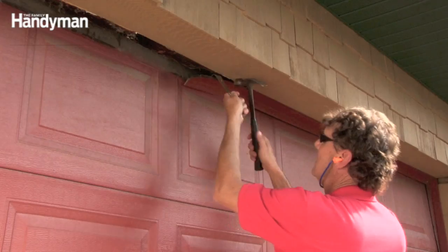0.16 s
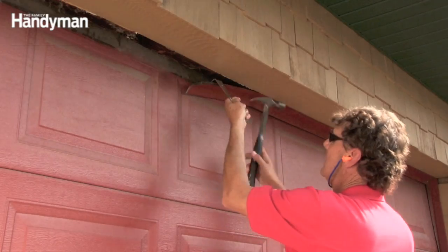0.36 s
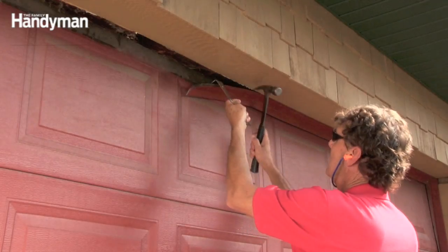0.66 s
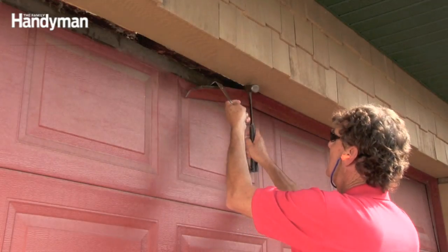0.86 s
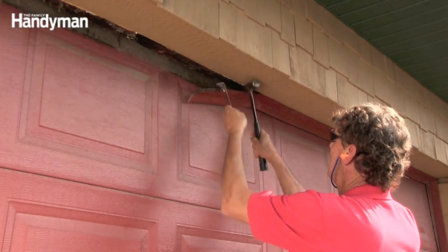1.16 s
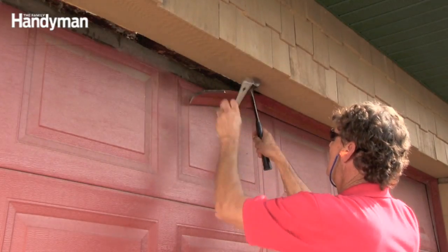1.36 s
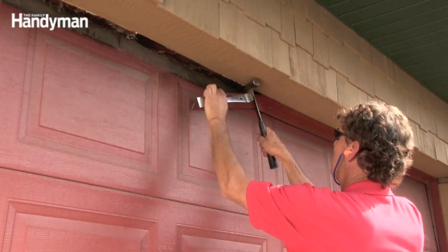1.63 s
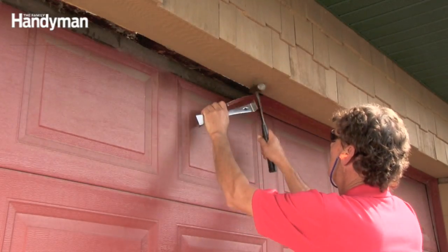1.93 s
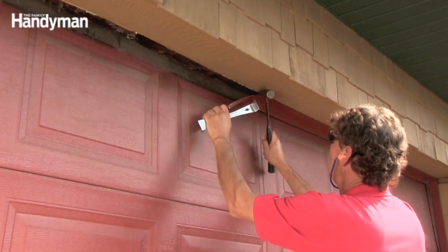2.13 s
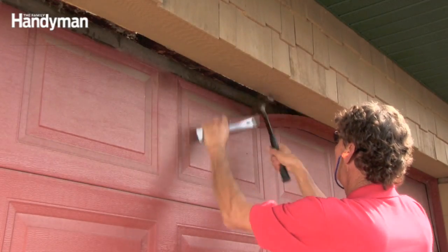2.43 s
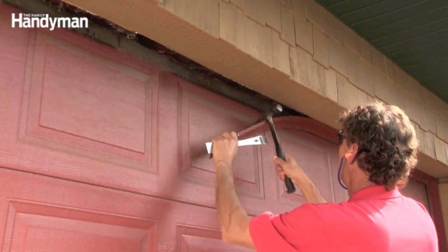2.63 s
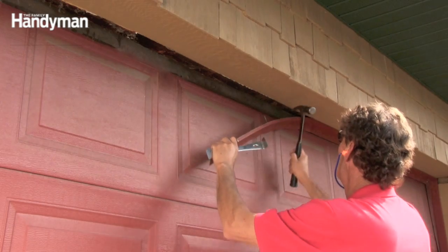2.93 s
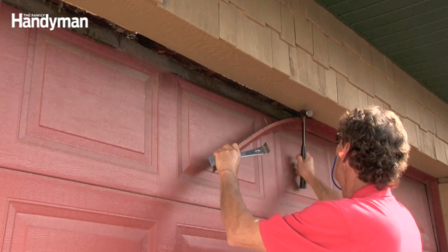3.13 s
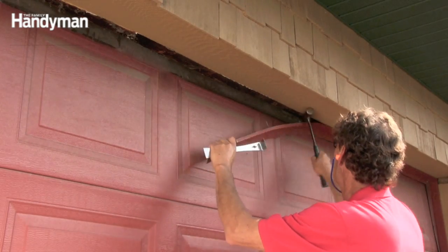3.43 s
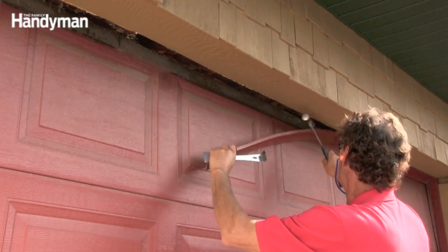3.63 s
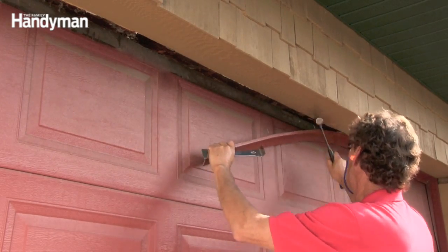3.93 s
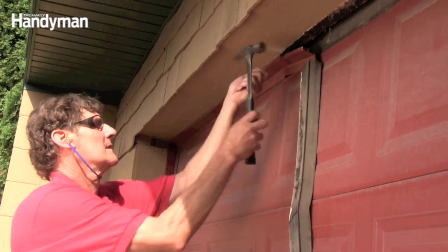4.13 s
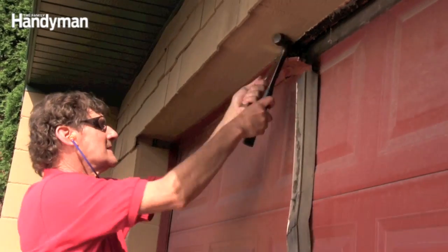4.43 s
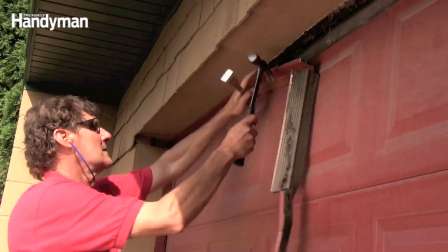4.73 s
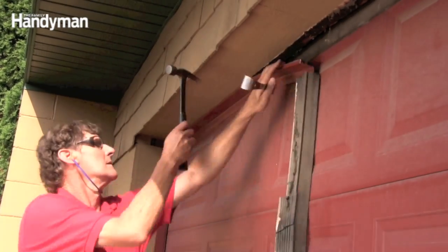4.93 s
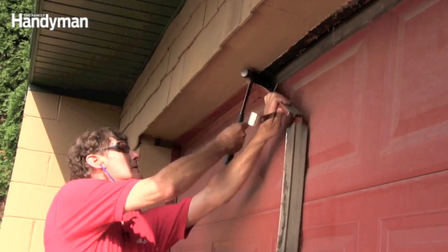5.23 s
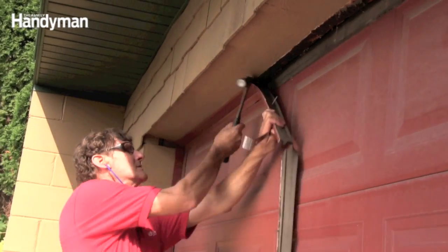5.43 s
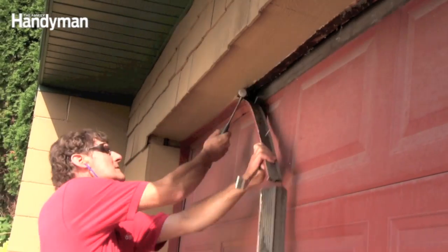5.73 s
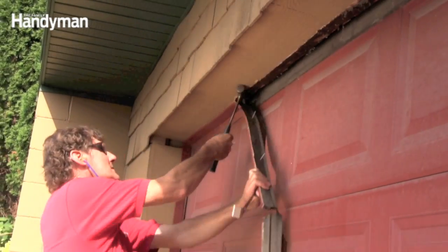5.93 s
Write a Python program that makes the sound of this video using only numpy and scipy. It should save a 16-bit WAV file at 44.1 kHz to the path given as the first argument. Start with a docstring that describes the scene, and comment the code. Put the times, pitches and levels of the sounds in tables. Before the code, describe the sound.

Close outdoor work on a wooden garage door frame, over a soft low rumble. From 0 to 0.3 s a faint steel ring and light taps; at 0.8-0.95 dull knocks and short rubbing scrapes. Around 1.25 a tiny metallic squeak and thin high ping, then very faint ticks to 1.8. At 2.1-2.3 firmer knocks boom in the door; at 2.4-2.56 a nail jerks loose in a quick stutter with strong knocks. A faint ping at 2.75, knocks at 3.1-3.3, then a slower ratcheting pull at 3.45-3.55 with gritty scraping. Ticks lead to bright wood cracks at 3.84 and 3.96. The air becomes a boxy sheltered hush. Clicks at 4.3, then a big splintering snap at 4.55-4.62. Scattered taps and scrapes follow from 4.84, a harsh nail screech lasting a few hundredths at 5.6, and small dry ticks until 6.0.

```python
"""Prying trim off a garage door frame

A claw hammer and a steel pry bar lever an old wooden stop loose: knocks, taps, splits and scrapes.
Blows are shaped fracture noise plus damped wood modes; the bar and grazed nails ring as decaying sines.
Nails let go in stick-slip jerks and one screech made of slip pulses driving nail modes.
The door panel booms behind the heavy knocks, the eave answers, and filtered noise is the outdoor air."""
import sys
import numpy as np
from scipy import signal
from scipy.fft import rfft, irfft, next_fast_len
from scipy.io import wavfile
from scipy.ndimage import map_coordinates

SR = 44100
rng = np.random.default_rng(int(sys.argv[2]) if len(sys.argv) > 2 else 0)


def inscribe(sig):
    """Save sig as 16-bit PCM at rate SR to the path in sys.argv[1].

    A 1-D sig is mono; a 2-D sig holds one channel per row.
    Samples are clipped to [-1, 1] before scaling.
    """
    pcm = np.round(np.clip(np.atleast_2d(sig).T, -1, 1) * 32767)
    wavfile.write(sys.argv[1], SR, pcm.astype(np.int16))


N = 267466
CLOCK_S = np.arange(N) / SR
T = np.arange(SR * 3 // 5) / SR  # time within one event, s


def amp(db):
    """Decibels to gain."""
    return 10 ** (np.asarray(db) / 20)


def unit(x):
    """Scale to rms 1."""
    return x / np.sqrt(np.mean(x ** 2) + 1e-20)


def punch(x):
    """Scale a blow so that its first 10 ms have rms 1."""
    return x / np.sqrt(np.mean(x[:SR // 100] ** 2) + 1e-20)


def along(points, hz):
    """Read (Hz, value) points on a log-frequency axis."""
    point_hz, value = np.transpose(points)
    return np.interp(np.log(hz + 1), np.log(point_hz), value)


def near(hz, centre_hz, octaves):
    """Bell of height 1 on the log-frequency axis."""
    return np.exp(-.5 * (np.log2((hz + 1) / centre_hz) / octaves) ** 2)


def fade(t60_s):
    """Exponential decay, 60 dB in t60_s."""
    return np.exp(-np.log(1000) * T / max(t60_s, 1e-3))


def add(track, start_s, x):
    """Mix x into the track at start_s."""
    part = track[max(round(start_s * SR), 0):][:len(x)]
    part += x[:len(part)]


def colour(x, points, peak_hz=1000, peak_db=0):
    """Minimum-phase filter with the given spectrum and an optional resonance."""
    m = 2 * next_fast_len(len(x) // 2 + 2048)
    hz = np.fft.rfftfreq(m, 1 / SR)
    gain_db = along(points, hz) + peak_db * near(hz, peak_hz, octaves=0.32)
    cepstrum = irfft(np.log(amp(gain_db)), m)
    # fold onto positive time: causal response
    cepstrum[1:m // 2] *= 2
    cepstrum[m // 2 + 1:] = 0
    return irfft(rfft(x, m) * np.exp(rfft(cepstrum)), m)[:len(x)]


def wobble(rate_hz, size):
    """Smooth random curve, rate_hz knots a second."""
    knots = rng.standard_normal(size // 8)
    return map_coordinates(knots, [np.arange(size) * rate_hz / SR], mode="mirror")


def ring(modes, scatter_db, detune):
    """Damped modes; each contact point draws new strengths, signs and slightly new pitches."""
    out = np.zeros(len(T))
    for hz, db, t60_s in modes:
        strength, pitch, sign = rng.standard_normal(3)
        tone = np.sin(2 * np.pi * hz * (1 + detune * pitch) * T)
        out += np.sign(sign) * amp(db + scatter_db * strength) * fade(t60_s) * tone
    return out


def fibres(size, clump_db):
    """Dense, clumped micro-fractures: noise with a random gain."""
    return unit(rng.standard_normal(size) * amp(clump_db * wobble(1532, size)))


# open-air rumble: (frequency [Hz], relative density [dB])
OPEN_SPECTRUM = [(15, -44), (25, -57), (55, -4), (80, -7), (130, -6), (195, -24.5), (416, -24.5),
                 (503, -21), (659, -27), (1020, -29), (1940, -39.5), (2350, -43), (4610, -53.5),
                 (7510, -49.5), (16000, -63)]
# sheltered corner: (frequency [Hz], relative density [dB])
CORNER_SPECTRUM = [(24, -83.5), (40, -63), (133, -10), (194, -5.5), (237, 1), (491, -12.5), (751, -18),
                   (896, -18.5), (990, -17), (1760, -21), (2050, -22), (5440, -32.5), (16000, -48)]
# thin high tones outdoors: (frequency [Hz], relative density [dB])
SIZZLE_SPECTRUM = [(5500, -14.5), (6150, 1), (6500, -11), (7250, -11.5), (7420, -5), (7580, -8), (7740, 11),
                   (8020, -25), (8400, 4), (8750, -10), (9400, -5), (11000, -14)]
# outdoor beds: (time [s], open rumble level [dB], corner level [dB], sizzle level [dB])
AIR_LEVELS = [(0, -44.5, -58, -92.5), (.5, -49, -64, -104), (2, -47, -64.5, -74.5), (3, -48.5, -60, -71.5),
              (4.1, -48, -48.5, -71), (4.5, -53.5, -49, -67), (4.75, -82, -46.5, -91),
              (5.4, -85, -47.5, -87), (6.06, -105, -52.5, -71)]


def air():
    """Low outdoor rumble gives way to the boxier hush of the corner under the eave."""
    times_s, *levels_db = np.transpose(AIR_LEVELS)
    out = np.zeros(N)
    for spectrum, db in zip((OPEN_SPECTRUM, CORNER_SPECTRUM, SIZZLE_SPECTRUM), levels_db):
        bed = unit(colour(rng.standard_normal(N), spectrum))
        out += bed * amp(np.interp(CLOCK_S, times_s, db) + 0.37 * wobble(20.0, N))
    return out


def splinters(rate_hz):
    """Single fibres parting at random moments, a few of them loud."""
    chance, size = rng.random(len(T)), rng.standard_normal(len(T))
    return unit(size * (chance < rate_hz / SR))


# door frame modes: (frequency [Hz], relative level [dB], t60 [s])
FRAME_MODES = [(229, 8, 0.17), (265.8, 4, 0.54), (288, -15, 0.53), (356.3, 13.5, 0.11), (402, 0.5, 0.29),
               (457, -8, 0.23), (497, 17, 0.08), (617, 13.5, 0.12), (600, -24.5, 0.067), (726, -31.5, 0.17)]
# loose trim modes: (frequency [Hz], relative level [dB], t60 [s])
TRIM_MODES = [(745, 9, 0.028), (868.5, 10.5, 0.05), (940, 3.5, 0.093), (967, -19, 0.017),
              (1184, -1.5, 0.14), (1305, -3.5, 0.054), (1420, 7, .026), (1496, -4, 0.039),
              (1530, 11.5, 0.014), (1670, 12.5, 0.013), (1910, -3, .03), (2064, -4.5, .07)]
# rubbing wood: (frequency [Hz], relative density [dB])
RUB_SPECTRUM = [(40, -81), (150, -33.5), (350, 10.5), (700, 6.5), (1300, 8.5), (1700, 2.5), (2300, 0),
                (4000, -11.5), (9000, -81)]
# scrape grit: (frequency [Hz], relative density [dB])
GRIT_SPECTRUM = [(1200, -43), (2500, 4), (5500, 10.5), (7500, 2), (12000, -2), (16000, -5)]
# trim and tools dragging: (start [s], length [s], level [dB], grit re body [dB])
SCRAPES = [(0, 0.037, -60.5, -2), (0.826, 0.081, -44.5, -22), (0.918, 0.03, -43.5, -6.5),
           (2.215, 0.1, -47, -12), (2.464, 0.036, -41, 2), (3.49, 0.1, -42, 9.5), (3.554, 0.2, -48, -6.5),
           (4.604, 0.094, -32, -30), (5.028, 0.12, -36.5, -15.5), (5.105, 0.072, -46, -14.5)]


def scrapes():
    """Each stroke swells quickly and runs out; its grains sound in the wood."""
    out = np.zeros(N)
    for start_s, length_s, db, grit_db in SCRAPES:
        stroke = np.abs(np.sin(np.pi * np.clip(T / length_s, 0, 1) ** 0.43))
        grains = fibres(len(T), clump_db=-1.0) + 0.49 * splinters(rate_hz=240)
        modes = ring(list(FRAME_MODES) + list(TRIM_MODES), scatter_db=-5.0, detune=.005)
        wood = signal.fftconvolve(grains, modes * fade(.15))[:len(T)]
        body = unit(unit(colour(grains, RUB_SPECTRUM)) + 0.35 * unit(wood))
        grit = amp(grit_db) * unit(colour(grains, GRIT_SPECTRUM))
        add(out, start_s, amp(db) * stroke * (body + grit))
    return out


# free pry bar modes: (frequency [Hz], relative level [dB], t60 [s])
STEEL_MODES = [(2600, 12, 0.15), (3800, 11, 0.2), (5000, 2, 0.32), (13400, -22, 0.22)]
# pry bar squeaking under load: (frequency [Hz], relative density [dB])
SQUEAK_SPECTRUM = [(400, -16), (900, 8), (1230, 9), (1700, 3), (2200, -11), (3000, -19), (3500, -6),
                   (3950, -14), (4600, -3), (5600, -21), (11300, -22), (12200, -21), (13200, -21)]
# pry bar skidding over a nail head: (start [s], length [s], level [dB])
SKIDS = [(1.236, 0.036, -46), (1.276, 0.016, -46.5)]


def steel():
    """The free bar rings thinly; the skidding bar stutters and squeaks."""
    out = np.zeros(N)
    add(out, 0, amp(-59) * punch(ring(STEEL_MODES, scatter_db=1, detune=.002)))
    for start_s, length_s, db in SKIDS:
        stutter = amp(3 * wobble(226, len(T))) * (T < length_s)
        squeak = unit(colour(rng.standard_normal(len(T)) * stutter, SQUEAK_SPECTRUM))
        add(out, start_s, amp(db) * np.sqrt(length_s / T[-1]) * squeak)
    return out


# wood pitches and door boom strength, set around each group of blows:
# (time [s], frame pitch [Hz], trim pitch [Hz], coupling to the door [dB])
RESPONSES = [(0.05, 231, 1470, 4), (0.9, 209, 1026, 0), (2.27, 225, 870, 1), (2.41, 510, 1220, -7),
             (2.46, 500, 1170, 6), (2.56, 360, 776, 0), (3.14, 403, 1440, -4.5), (3.85, 370, 1440, 11.5),
             (3.971, 327, 1340, -22), (4.551, 300, 1460, -64), (5.4, 255, 1400, -50)]


def response(time_s):
    """Frame pitch, trim pitch and door coupling interpolated at time_s."""
    times_s, *columns = np.transpose(RESPONSES)
    return [np.interp(time_s, times_s, column) for column in columns]


def favour(modes, centre_hz):
    """The point of contact favours the modes around one pitch."""
    return [(hz, db + 11 * near(hz, centre_hz, octaves=0.22), t60_s) for hz, db, t60_s in modes]


# crack body: (frequency [Hz], relative density [dB])
CRACK_SPECTRUM = [(900, -26.5), (1700, 2.5), (2300, 4), (3200, 1.5), (4500, 0), (6100, -2), (7500, -11.5),
                  (11000, -31)]
# bright edge of a crack: (frequency [Hz], relative density [dB])
EDGE_SPECTRUM = [(4000, -46.5), (6500, -2.5), (8000, 5.5), (10500, 7), (13000, 5.5), (16000, -5.5)]
# crowded wall modes: (frequency [Hz], relative density [dB])
THUD_SPECTRUM = [(50, -63.5), (130, -7.5), (230, 2.5), (500, -0.5), (750, -5.5), (1100, -13.5), (3000, -46)]


def contact(crack_db, edge_db, trim_db, frame_db, t60_s, trim_hz, crack_hz, frame_hz, rise_s, clump_db, snap):
    """A burst of fracture noise, the clack of the trim and the duller knock of the frame."""
    # the first fibre gives with a snap, the rest follow
    envelope = (fade(t60_s) + snap * fade(0.003)) * (1 - np.exp(-T / rise_s))
    burst = fibres(len(T), clump_db) * envelope
    crack = punch(colour(burst, CRACK_SPECTRUM, crack_hz, peak_db=6.5))
    edge = punch(colour(burst, EDGE_SPECTRUM, crack_hz, peak_db=14.0))
    # extra fades: the pressing tool damps the modes
    strip = ring(favour(TRIM_MODES, trim_hz), scatter_db=4.5, detune=0.009) * fade(.12)
    rub = colour(burst, RUB_SPECTRUM, trim_hz, peak_db=9.5)
    clack = punch(punch(strip) + punch(rub))
    wall = colour(rng.standard_normal(len(T)) * fade(0.14), THUD_SPECTRUM, frame_hz, peak_db=5)
    frame = ring(favour(FRAME_MODES, frame_hz), scatter_db=0.5, detune=0.005) * fade(0.45)
    knock = (punch(frame) + punch(wall)) * (1 - np.exp(-T / 0.00056))
    knock = knock / np.std(knock[:SR // 40])
    return amp(crack_db) * crack + amp(edge_db) * edge + amp(trim_db) * clack + amp(frame_db) * knock


# centres of (crack, edge, trim, frame) and the pivot of the hardness tilt
LAYER_HZ, PIVOT_HZ = (3200, 9000, 1200, 350), 1800


def strike(level_db, time_s, hardness_db_oct, mix_db, t60_s, crack_hz, rise_s, clump_db, snap):
    """One contact: hardness favours the high layers, the time sets the pitch of the wood."""
    frame_hz, trim_hz, _ = response(time_s)
    tilt_db = hardness_db_oct * np.log2(np.array(LAYER_HZ) / PIVOT_HZ)
    layers_db = level_db + np.array(mix_db) + tilt_db
    return contact(*layers_db, t60_s, trim_hz, crack_hz, frame_hz, rise_s, clump_db, snap)


# door panel modes: (frequency [Hz], relative level [dB], t60 [s])
DOOR_MODES = [(80, -8, 0.2), (92.75, -0.5, 0.36), (108, -6, 0.26), (138.4, -13, 0.31), (163.4, -1.5, 0.11),
              (222, 0.5, 0.14)]


def boom():
    """The wide door panel, pushed at its edge, takes a moment to swing up."""
    detune = 1 + 0.012 * rng.standard_normal()
    panel = np.zeros(len(T))
    for hz, db, t60_s in DOOR_MODES:
        phase_rad = rng.normal(0, 0.73)
        panel += amp(db) * fade(t60_s) * np.sin(2 * np.pi * hz * detune * T + phase_rad)
    panel = panel * (1 - np.exp(-T / 0.009))
    return panel / np.max(np.abs(panel))


def shake(time_s, db):
    """The door booms as far as the blow reaches it."""
    return amp(db + response(time_s)[2]) * boom()


# tool set against the trim, or trim slapping back:
# (time [s], level before mix [dB], hardness [dB/octave], door push re level, before coupling [dB])
KNOCKS = [(0.0414, -43.5, 0, 10.5), (0.2254, -39.5, 3.2, -5.5), (0.83, -36.5, 2.3, 19.5),
          (0.9372, -41.5, -1.5, 14), (2.128, -31.5, 1.2, 11), (2.2693, -32.5, 0.3, 2),
          (2.4528, -23, 0.5, 2.5), (2.4621, -23, 0.5, -23), (2.5099, -34.5, 2, 11), (2.563, -36.5, -1, -4),
          (3.1371, -32, 0.6, 12.5), (3.2468, -32, 4.8, 1.5), (3.3038, -36.5, -1.1, 15)]
KNOCK_MIX_DB = (-9.5, -24.5, 1, 1)  # crack, edge, trim, frame


def knocks():
    """Dull, heavy contacts that shake the door."""
    out = np.zeros(N)
    for time_s, db, hardness, push_db in KNOCKS:
        blow = strike(db, time_s, hardness, KNOCK_MIX_DB, t60_s=0.019, crack_hz=2800,
                      rise_s=0.00053, clump_db=11.5, snap=0.6)
        add(out, time_s, blow + shake(time_s, db + push_db))
    return out


# fibres and paint flakes ticking while a tool shifts:
# (start [s], length [s], mean level before mix [dB], hardness [dB/octave])
STRAINS = [(0.298, 0.055, -76, 9), (1.624, 0.12, -83, 15.5), (2.8, 0.022, -56, 2.5),
           (4.374, 0.078, -56, 3.5), (5.362, .11, -56.5, 3.5)]
STRAIN_SCATTER_DB = 3


def strained(count):
    """Faint ticks, one at random in each of count equal parts of a spell of strain."""
    out = []
    for start_s, length_s, mean_db, hardness in STRAINS:
        for k in range(count):
            time_s = start_s + length_s * (k + rng.random()) / count
            db = mean_db + STRAIN_SCATTER_DB * rng.standard_normal()
            out.append((time_s, db, hardness, .014, 2700))
    return out


# light tool taps: (time [s], level before mix [dB], hardness [dB/octave], crack t60 [s], crack pitch [Hz])
TICKS = [(0.1402, -49, 2, 0.019, 6600), (1.0782, -55, -5.5, 0.028, 2850), (1.2426, -60.5, -8, 0.015, 4640),
         (1.5487, -50.5, -1, 0.023, 2220), (1.6942, -55.5, -1.5, .014, 2340),
         (1.7983, -55, -5, 0.022, 4740), (2.798, -48, 7, 0.013, 2710), (3.4246, -50.5, 3, 0.018, 3400),
         (3.6037, -39.5, 3, .011, 5100), (3.704, -39, 0, 0.042, 2950), (3.7368, -35.5, 4, 0.0088, 3960),
         (4.3028, -41, -0.5, 0.0032, 2230), (4.341, -34.5, 0, 0.041, 2220),
         (4.844, -35.5, -1.3, 0.017, 4280), (5.1508, -46, -1.5, .03, 2620),
         (5.1932, -51, -2.5, 0.019, 2600), (5.254, -37.5, -1.5, 0.007, 2560),
         (5.4844, -40.5, 0.5, 0.016, 2500), (5.527, -34.5, -1.5, 0.021, 2800),
         (5.6313, -32, 0, 0.013, 6400), (5.8353, -38, 3, 0.018, 2400), (5.9185, -43.5, 7, 0.0057, 7440),
         (6.0001, -45, 1, .026, 2800)]
TICK_MIX_DB = (-0.5, -13, 1, -2.5)  # crack, edge, trim, frame


def ticks():
    """Light contacts leave the door still."""
    out = np.zeros(N)
    for time_s, db, hardness, t60_s, crack_hz in list(TICKS) + strained(count=4):
        tap = strike(db, time_s, hardness, TICK_MIX_DB, t60_s, crack_hz,
                     rise_s=0.0013, clump_db=8.5, snap=1.9)
        add(out, time_s, tap)
    return out


# grazed nails: (time [s], peak level [dB], pitch [Hz], t60 [s])
PINGS = [(1.273, -56, 12260, 0.13), (2.745, -60.5, 5955, 0.38)]


def pings():
    """Each grazed nail swells into one thin tone; a long ring builds slowly."""
    out = np.zeros(N)
    for time_s, db, hz, t60_s in PINGS:
        tone = fade(t60_s) * (1 - fade(.4 * t60_s)) * np.sin(2 * np.pi * hz * T)
        add(out, time_s, amp(db) * tone / np.max(np.abs(tone)))
    return out


# nail leaving the frame in jerks: (start [s], length [s], gap [s], first level before mix [dB],
# loss a jerk [dB], door push re level, before coupling [dB], crack pitch [Hz])
NAIL_PULLS = [(2.3976, .058, .0117, -22.5, 0.2, -11, 3980), (3.4498, .099, .0165, -21.5, 1, -3.5, 4980)]
JERK_MIX_DB = (-3, -12, 1.5, -1.5)  # crack, edge, trim, frame
FIRST_STICK_GAPS = .19  # extra hold of the first jerk
FIRST_DULL_DB_OCT, SHARPEN_DB_OCT = -1.5, 0.72  # hardness of the first jerk; gain per later jerk


def pulls():
    """A nail breaks loose with a dull jerk, then sticks and slips evenly, weaker and harder each time."""
    out = np.zeros(N)
    for start_s, length_s, gap_s, first_db, loss_db, push_db, crack_hz in NAIL_PULLS:
        for k in range(round(length_s / gap_s)):
            time_s = start_s + gap_s * (k + FIRST_STICK_GAPS * (k > 0))
            db = first_db - loss_db * k
            hardness = SHARPEN_DB_OCT * k + FIRST_DULL_DB_OCT * (k == 0)
            jerk = strike(db, time_s, hardness, JERK_MIX_DB, t60_s=0.014, crack_hz=crack_hz,
                          rise_s=0.0011, clump_db=2.0, snap=1.6)
            add(out, time_s, jerk + shake(time_s, db + push_db))
    return out


# wood snapping free: (time [s], level before mix [dB], hardness [dB/octave], crack t60 [s], crack pitch [Hz])
SPLITS = [(3.8402, -30, 7, 0.019, 10400), (3.8437, -24, -4.5, 0.033, 5000), (3.9547, -28, -2, 0.012, 4400),
          (3.9624, -22, 2.5, 0.025, 3800), (4.5469, -16.5, 0.5, 0.037, 2210),
          (4.558, -22, -3.5, 0.067, 2560), (4.5888, -27.5, 3, 0.028, 5370),
          (4.609, -31.5, -1.5, 0.0077, 2700), (4.621, -25.5, -1.5, 0.037, 3160)]
SPLIT_MIX_DB = (0, -6.5, 1, -9)  # crack, edge, trim, frame


def splits(push_db):
    """Bright fractures of dry wood; the earlier ones also shake the door, the later ones hardly at all."""
    out = np.zeros(N)
    for time_s, db, hardness, t60_s, crack_hz in SPLITS:
        fracture = strike(db, time_s, hardness, SPLIT_MIX_DB, t60_s, crack_hz,
                          rise_s=0.00089, clump_db=5.0, snap=.18)
        add(out, time_s, fracture + shake(time_s, db + push_db))
    return out


# nail dragged under tension: (frequency [Hz], relative level [dB], t60 [s])
NAIL_MODES = [(300, -12.5, .03), (709, 0, 0.057), (1057, 6.5, 0.022), (1490, 0, .012), (2700, 13.5, 0.01),
              (3040, 13.5, 0.0085), (3277, 9, .02), (3620, 7.5, 0.015), (4260, -0.5, .02),
              (9550, -1.5, 0.017), (13100, 8, 0.016)]
# rasp of the nail hole: (frequency [Hz], relative density [dB])
RASP_SPECTRUM = [(40, -24), (100, -18), (150, 9.5), (200, -8.5), (300, 5), (500, -8.5), (1100, 1.5),
                 (2000, -0.5), (3200, 3.5), (5000, 0), (10000, 1), (13000, -8.5), (16000, -14.5)]
# pull on that nail: (time [s], level [dB], mean slip rate [Hz])
SCREECH_PULL = [(5.592, -70, 620), (5.5945, -11.5, 736), (5.605, -10, 744), (5.614, -12.5, 910),
                (5.616, -12, 640), (5.627, -22.5, 1000), (5.635, -49, 790), (5.654, -43, 910)]


def screech(jitter, rasp_db):
    """A nail sticks and slips at an unsteady rate, ringing and rasping in its hole."""
    times_s, levels_db, rates_hz = np.transpose(SCREECH_PULL)
    now_s = T + times_s[0]
    rate_hz = np.interp(now_s, times_s, rates_hz) * (1 + jitter * wobble(700, len(T)))
    turns = np.cumsum(rate_hz) / SR
    slips = np.diff(np.floor(turns), prepend=-1) * amp(2 * rng.standard_normal(len(T)))
    tone = signal.fftconvolve(slips, ring(NAIL_MODES, scatter_db=2, detune=.002))[:len(T)]
    tone = tone / np.std(tone[T < times_s[-1] - times_s[0]])
    rasp = amp(rasp_db) * unit(colour(fibres(len(T), clump_db=5.0), RASP_SPECTRUM))
    level = amp(np.interp(now_s, times_s, levels_db, right=-120))
    out = np.zeros(N)
    add(out, times_s[0], level * (tone + rasp) / np.hypot(1, amp(rasp_db)))
    return out


# eave tail: (frequency [Hz], t60 [s])
EAVE_T60 = [(100, 1), (400, 0.76), (1500, 0.36), (5000, 0.25), (15000, 0.11)]


def eave(x, echo_db, early_db, tail_db):
    """One bright slap from the soffit, scatter from the near walls and a faint tail."""
    hz, frame_s, z = signal.stft(rng.standard_normal(len(T)), SR, nperseg=256)
    decay = np.exp(-np.log(1000) * frame_s / along(EAVE_T60, hz)[:, None])
    tail = signal.istft(z * decay, SR, nperseg=256)[1][:len(T)]
    early = rng.standard_normal(len(T)) * fade(0.086)
    slap = colour(1. * (T == 0), [(2000, -11), (5000, 7.0), (6500, 2.5), (9000, -11)])
    answer = np.zeros(len(T))
    add(answer, .003, amp(early_db) * early / np.linalg.norm(early))
    add(answer, .012, amp(tail_db) * tail / np.linalg.norm(tail))
    add(answer, .0072, amp(echo_db) * slap)
    return x + signal.fftconvolve(x, answer)[:N]


def scene():
    """All the work on the frame, heard under the eave, over the outdoor air."""
    work = knocks() + splits(push_db=-9) + ticks() + steel() + pings() + scrapes()
    work = eave(work, echo_db=-31, early_db=-11, tail_db=-21)
    # close under the soffit
    jerks = eave(pulls(), echo_db=-11, early_db=-8.5, tail_db=-13.0)
    # weaker slap and tail than the jerks
    squeal = eave(screech(jitter=0.022, rasp_db=0.5), echo_db=-24.0, early_db=-12.0, tail_db=-35)
    return (work + jerks + squeal + air())[None]


TOP_HZ = 16100


def record(dry):
    """Round off the loudest peaks, then remove everything from TOP_HZ up."""
    rounded = dry / (1 + np.abs(dry / .55) ** 6) ** (1 / 6)  # ceiling 0.55
    m = next_fast_len(N + SR // 2)
    band = np.fft.rfftfreq(m, 1 / SR) < TOP_HZ
    return irfft(rfft(rounded, m) * band, m)[..., :N]


dry = scene()
out = record(dry)
inscribe(out)
```